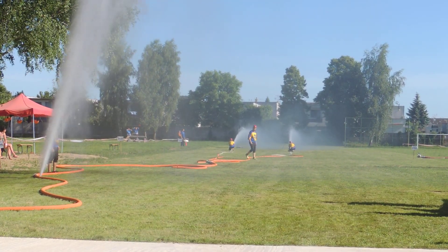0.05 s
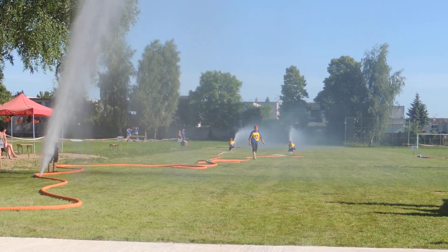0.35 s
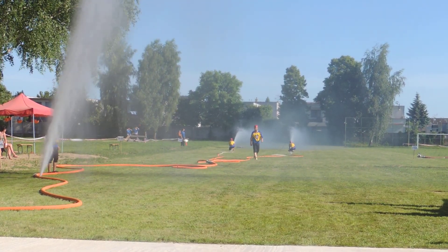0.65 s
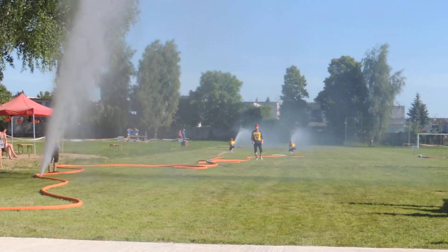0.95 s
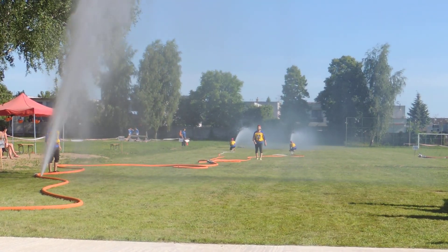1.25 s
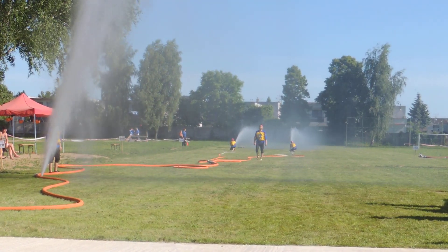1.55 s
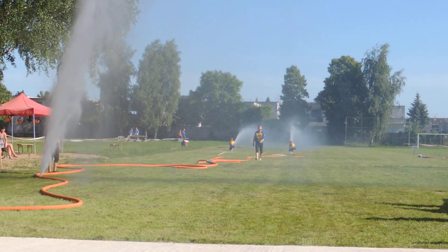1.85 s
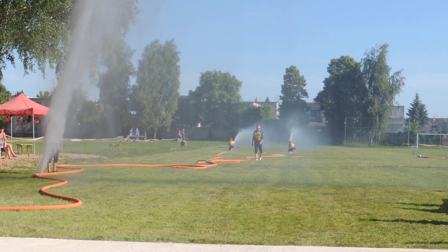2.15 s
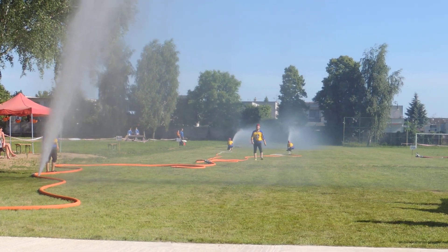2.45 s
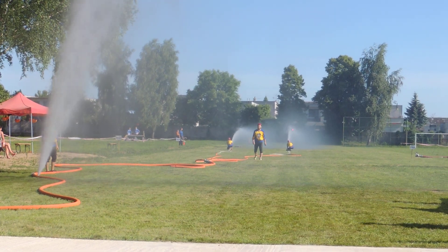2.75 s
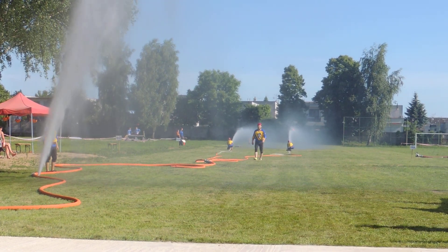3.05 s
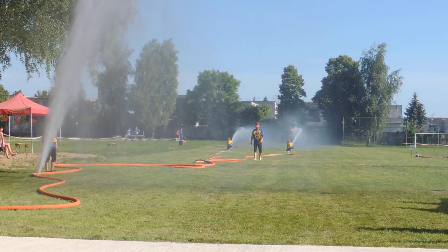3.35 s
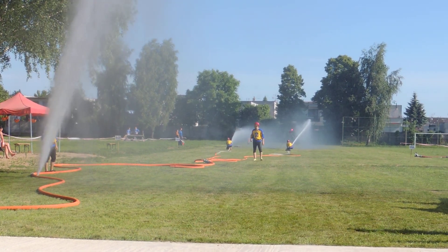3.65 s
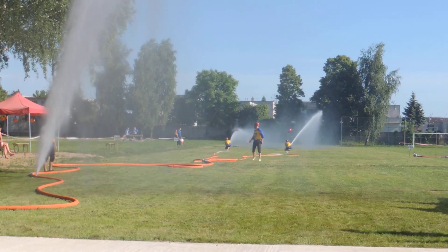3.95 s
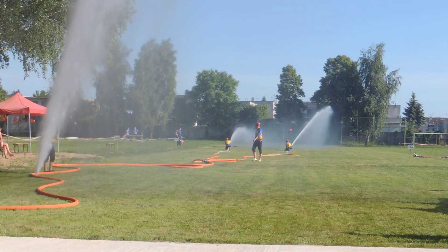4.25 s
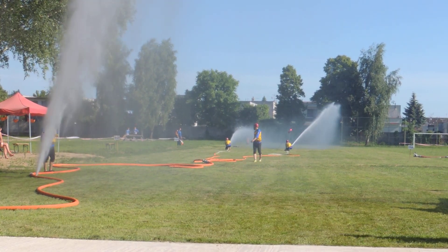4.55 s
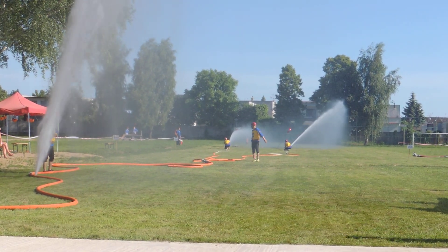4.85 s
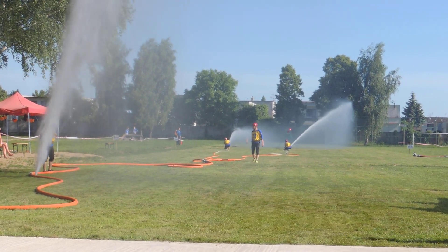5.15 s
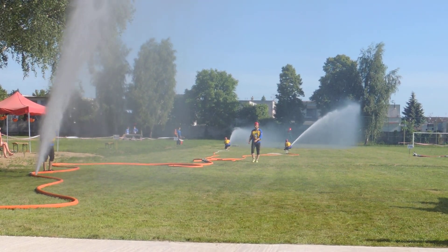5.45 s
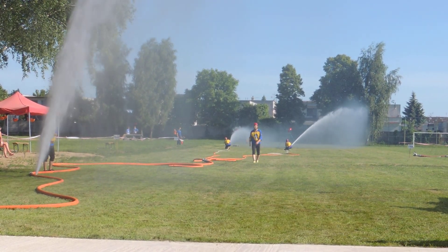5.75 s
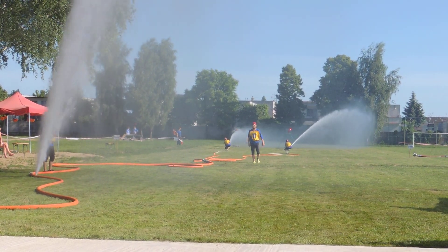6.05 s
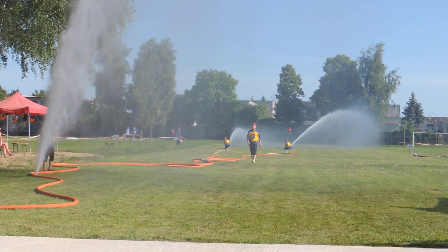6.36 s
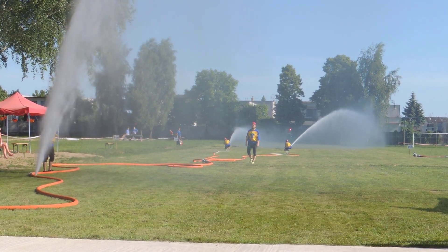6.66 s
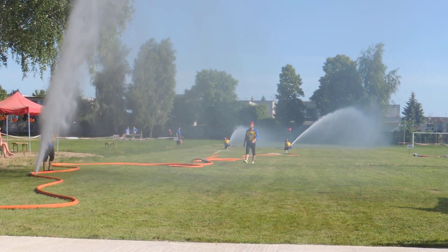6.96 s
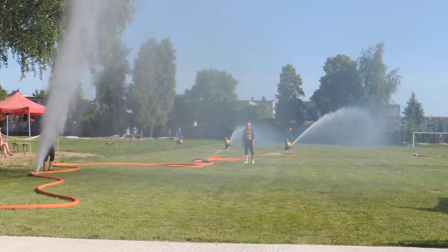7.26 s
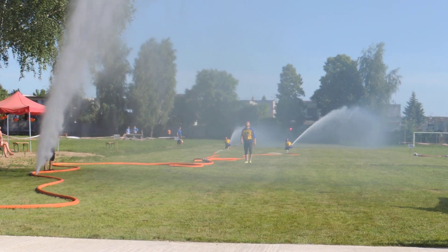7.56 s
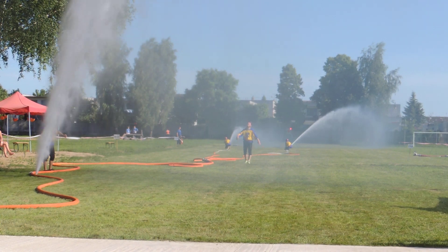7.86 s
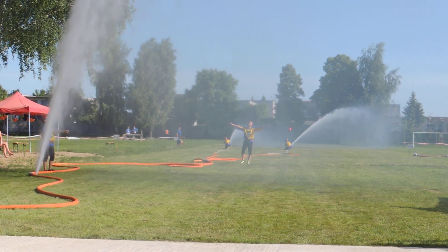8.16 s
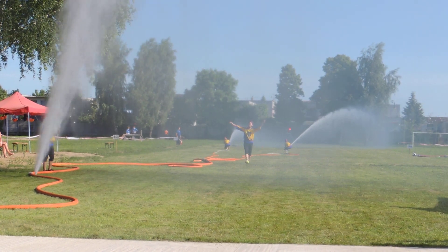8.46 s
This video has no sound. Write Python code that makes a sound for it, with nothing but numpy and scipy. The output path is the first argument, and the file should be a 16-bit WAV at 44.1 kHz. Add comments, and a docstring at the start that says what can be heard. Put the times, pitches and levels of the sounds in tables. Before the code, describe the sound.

Outdoors on a field, a pump engine at full throttle makes a steady, buzzing drone with a hard exhaust crackle, heard slightly from the left. Far behind it, spray from fire hoses hisses softly. The pitch lifts a touch and stays there until the last second, when the engine takes on load, drops lower and turns heavier and rougher.

```python
"""A four-cylinder fire pump engine runs flat out on a sports field, off to the left.
From the start its open exhaust drones and cracks, hardest at every second firing; the manifold buzzes,
gas rushes out, the field scatters the sound back and the water jets hiss far off.
Near 3 s the load eases and the revs climb a little, then hold.
From 7.5 s the pump bites: the revs sag and the engine lugs, thumping unevenly."""
import sys
import numpy as np
from scipy import signal
from scipy.fft import rfft, irfft
from scipy.io import wavfile
from scipy.ndimage import uniform_filter1d

SR = 44100
rng = np.random.default_rng(int(sys.argv[2]) if len(sys.argv) > 2 else 0)


def log_audio(samples):
    """Write samples as a 16-bit WAV file to the path given in sys.argv[1]."""
    # one column per channel
    frames = np.atleast_2d(samples).T
    # limit to full scale, then quantise
    limited = np.clip(frames, -1, 1)
    pcm = np.round(limited * 32767).astype(np.int16)
    wavfile.write(sys.argv[1], SR, pcm)


N = 375732
TIME = np.arange(N) / SR


# Relative levels of the exhaust orders by load: firing_multiple, light_db, working_db, heavy_db, lugging_db
EXHAUST_ORDERS = [(0.5, -56.5, -55.5, -53, -49.5), (1.0, -37, -32.5, -28, -30.5),
                  (1.5, -41.0, -41, -42, -38.0), (2.0, -38, -38, -27, -27.5),
                  (2.5, -45.0, -45.0, -37, -33.5), (3.0, -32.5, -28.0, -27, -33), (3.5, -47, -52, -35, -55),
                  (4.0, -34.5, -30.5, -31, -27.5), (4.5, -51, -52.0, -50, -45),
                  (5.0, -49.5, -44, -28.5, -35), (5.5, -50.5, -80, -50.0, -45), (6.0, -33, -34, -37.5, -44),
                  (6.5, -49.5, -46, -36, -41), (7.0, -38, -37, -44, -36), (7.5, -52, -60, -41, -52),
                  (8.0, -82, -66, -55, -48), (8.5, -50.5, -69, -65, -58.0), (9.0, -38, -38, -32.5, -43),
                  (9.5, -53.0, -57.5, -49, -41), (10.0, -37.5, -45, -53, -46),
                  (10.5, -51, -49.5, -49.0, -49), (11.0, -44, -38, -41, -41), (11.5, -81, -80, -47, -44),
                  (12.0, -49, -52, -51.0, -55)]

def drone(turns, load, level_db, pipe_hz=135, pipe_q=1.0, echo_s=0.00565, thump_s=0.00093, waver_hz=3):
    """Harmonic series: the pipe radiates engine orders, balanced by load and wavering in moving air."""
    multiples, *by_load = np.transpose(EXHAUST_ORDERS)
    mean_firing_hz = turns[-1] / TIME[-1]
    hz = multiples * mean_firing_hz
    # one reflection and the pipe's broad resonance set each order's phase
    reflection = 1 + 0.63 * np.exp(-2j * np.pi * hz * echo_s)
    impedance = 1 + 1j * pipe_q * (hz / pipe_hz - pipe_hz / hz)
    phases = np.angle(reflection / impedance)
    # under heavy load the blow-down pulls the whole orders into one thump per firing
    thump = np.clip(0.57 * (load - 1) / 2, 0, 1)
    note = np.zeros(N)
    for multiple, phase, levels_db in zip(multiples, phases, np.transpose(by_load)):
        gain = amp(np.interp(load, np.arange(len(levels_db)), levels_db) + 0.72 * wander(waver_hz))
        aligned = thump * (round(2 * multiple) % 2 == 0)
        angle = 2 * np.pi * multiple * (turns - aligned * thump_s * mean_firing_hz) + (1 - aligned) * phase
        waver = amp(-54) * np.sqrt(multiple / multiples[-1]) * wander(waver_hz)
        note -= gain * np.cos(angle) + waver * np.sin(angle)
    power = uniform_filter1d(note ** 2, size=8192)
    return from_left(amp(level_db) * note / np.sqrt(power))


def lope(turns, load, swing_db=0.4, stumble_db=1.0, stumble_hz=60):
    """Amplitude modulation: a lugging engine swings once a cycle and stumbles between firings."""
    lugging = np.clip((load - 1) / 2, 0, 1)
    swing = -np.cos(2 * np.pi * turns / len(CYLINDER_DB))
    return amp(lugging * (swing_db * swing + stumble_db * wander(stumble_hz)))


# Engine speed: time_s, firing_hz
FIRING_RATE = [(0, 134.9), (0.7, 134.9), (1.52, 135.41), (1.87, 134.76), (2.9, 135.45), (3.22, 136.81),
               (4.4, 136.88), (5.2, 136.47), (5.55, 136.91), (6.55, 136.62), (7.48, 137.0), (7.8, 135.39),
               (8.24, 131.63), (8.52, 125.03)]

def crankshaft(start_turn=0.63, unsteadiness=0.0006):
    """Phase is the integral of frequency: gives the firing rate and its phase, one turn per firing."""
    firing_hz = np.interp(TIME, *np.transpose(FIRING_RATE))
    unsteady_hz = firing_hz * (1 + unsteadiness * wander(12))
    return firing_hz, start_turn + np.cumsum(unsteady_hz) / SR


# Base levels at light, working, heavy and lugging load: firing_hz, drone_db, crack_db
LOAD_STATES = [(136.77, -26.5, -29.5), (135.45, -24.5, -27.5), (131.9, -20.5, -30.5), (129.3, -21, -32.5)]

def pump_load(firing_hz):
    """Torque balance: at full throttle, lower revs mean more load (0 to 3), which sets the levels."""
    rates_hz, drone_db, crack_db = np.transpose(LOAD_STATES)
    steps = np.arange(len(LOAD_STATES))
    load = np.interp(-firing_hz, np.sort(-rates_hz), steps)
    return load, np.interp(load, steps, drone_db), np.interp(load, steps, crack_db)


# Brief rises and dips of the engine sound: middle_s, length_s, drone_db, crack_db
LEVEL_SWELLS = [(1.313, 0.84, 0.8, -0.4), (1.9, 1, -1.3, -1.2), (2.16, 0.27, -0.5, -1.3),
                (2.346, 0.21, 2, 1.4), (3.07, 0.72, 1.2, 1.3), (3.326, 0.46, 0.5, 1), (5.897, 0.16, 1.6, 2),
                (6.41, 1, 0, 1.1), (6.866, 0.57, -2, -1), (7.8, 0.66, -0.2, 0.4), (8.174, 0.51, -3.4, -1.2)]

def swells():
    """Slow amplitude modulation: raised-cosine level changes of the drone and the cracks, in dB."""
    middle_s, length_s, *heights_db = np.transpose(LEVEL_SWELLS)
    position = np.clip((TIME - middle_s[:, None]) / length_s[:, None], -.5, .5)
    return np.array(heights_db) @ np.cos(np.pi * position) ** 2


# Relative crack strength of each cylinder, in firing order: level_db
CYLINDER_DB = [-2.5, -11, 1, -8]

def firings(turns, load, uneven_db=1.3, jitter_s=0.000016, catch_up=0.18):
    """Cyclic variation: an impulse for each burn, no two alike; weak cylinders catch up under load."""
    clicks = np.zeros(N)
    for cylinder, level_db in enumerate(CYLINDER_DB):
        numbers = np.arange(cylinder, turns[-1], len(CYLINDER_DB))
        numbers = numbers[numbers > turns[0]]
        chance = rng.standard_normal((512, 2))[:len(numbers)]
        centres = (np.interp(numbers, turns, TIME) + jitter_s * chance[:, 0]) * SR
        # a windowed sinc places each impulse between samples
        taps = centres.astype(int)[:, None] + np.arange(-8, 9)
        pulses = np.sinc(taps - centres[:, None]) * np.hanning(taps.shape[1])
        pulses *= amp(uneven_db * chance[:, 1:])
        strength = amp(level_db * (1 - catch_up * np.maximum(load - 1, 0)))
        clicks += strength * np.bincount(np.clip(taps, 0, N - 1).ravel(), pulses.ravel(), N)
    return clicks


# Spectrum of the shock front: frequency_hz, gain_db
SHOCK_SPECTRUM = [(100, -54), (600, 6.5), (1100, -15), (1400, -10.5), (1750, -2), (2300, -9), (2680, -13),
                  (2950, 8), (3800, -0.5), (6600, -3.5), (7150, 6.5), (7600, 2.5), (8300, 3.5), (9400, -3),
                  (14200, -7.5)]
# Reflections from the ground and the pump frame: delay_s, gain
REFLECTIONS = [(.0007, 0.23), (.0019, 0.25), (.0042, .25)]

def cracks(clicks, level_db):
    """Nonlinear steepening: each blow-down becomes a shock front, followed by its reflections."""
    shock = -colour(clicks, SHOCK_SPECTRUM)[0]
    echoes = sum(gain * np.interp(TIME - delay_s, TIME, shock, left=0) for delay_s, gain in REFLECTIONS)
    near = amp(-5) * scatter(shock, t60_s=0.021)
    far = amp(-10) * scatter(shock, t60_s=0.1)
    return amp(level_db) * unit(from_left(shock + echoes) + near + far)


# Spectrum of the rushing exhaust gas: frequency_hz, gain_db
GAS_SPECTRUM = [(30, -15.5), (90, -7), (200, -3), (420, -1), (600, -3.5), (900, 1), (1120, -5.5), (1400, 0),
                (1750, -5.5), (2350, 3.5), (2700, -24), (3200, -2.5), (4400, -4), (6700, -4.5), (7200, 1),
                (7700, -3), (9400, -6.5), (12500, -5.5), (14200, -9.5)]

def gas_rush(clicks, level_db, burst_s=0.00029, tail_s=0.0055, steady=0.78, diffuse_hz=1500):
    """Turbulence noise: each firing spits a decaying burst of gas on top of a steady flow."""
    burst, tail = (signal.lfilter([1], [1, -np.exp(-1 / (SR * s))], clicks) for s in (burst_s, tail_s))
    lingering = 0.089 * tail + steady
    direct = from_left(colour((burst + lingering) * rng.standard_normal(N), GAS_SPECTRUM))
    diffuse = colour(lingering * rng.standard_normal((2, N)), GAS_SPECTRUM)
    # long waves arrive alike on both sides, so only the treble is diffuse
    return amp(level_db) * unit(direct + amp(1.2) * highpass(diffuse, diffuse_hz))


# Resonances of the ringing manifold: frequency_hz, gain_db
MANIFOLD_RESONANCES = [(100, -36), (170, 1), (270, -24), (370, 7), (440, -22.5), (510, 13), (580, -25),
                       (650, 3.5), (1000, 2), (1130, -7), (1440, -3.5), (1600, -7.5), (1830, -1),
                       (1900, -5), (2020, 8.5), (2130, -8), (2330, 9), (2450, 4.5), (2560, -22),
                       (2760, -28), (2860, 16), (3000, -9), (3280, 4), (3420, -6), (3880, 4), (4300, -27),
                       (5200, -1.5), (6400, -10), (7200, -8.5), (9400, -14.5), (14000, -16)]

def manifold_rasp(turns, level_db, ring_s=0.03, odd_db=-6, drift=0.3, drift_hz=4, size=2048):
    """Forced vibration: each firing rattles its manifold branch, a buzz that repeats once a cycle."""
    cylinders = len(CYLINDER_DB)
    cycle_grid = np.arange(size) / size
    cylinder, turns_since = np.divmod(cycle_grid * cylinders, 1)
    since_s = turns_since * TIME[-1] / turns[-1]
    decay = amp(CYLINDER_DB)[cylinder.astype(int)] * np.exp(-since_s / ring_s)
    orders = rfft(decay * rng.standard_normal((2, size)))[:, :400]
    # all orders start equally strong; the resonances pick them out as the revs move
    orders /= abs(orders)
    # the two halves of a cycle sound nearly alike, so the odd orders are weaker
    orders[:, 1::2] *= amp(odd_db)
    # the low orders leave through the pipe, as the drone
    orders[:, np.round(np.transpose(EXHAUST_ORDERS)[0] * cylinders).astype(int)] = 0
    shapes = irfft(orders, size)
    steady, changing = (np.interp(turns / cylinders, cycle_grid, shape, period=1) for shape in shapes)
    ring = colour(steady + drift * wander(drift_hz) * changing, MANIFOLD_RESONANCES)[0]
    return amp(level_db) * unit(from_left(ring) + amp(-13) * scatter(ring, t60_s=0.16))


# Phase lead of the engine's sound on the left: frequency_hz, lead_rad
LEFT_LEAD = [(0, 0.41), (135, 0.18), (500, 0.43), (1550, 1.22), (1900, 1.64), (2240, 2.19), (2600, 1.97),
             (3100, 3.12), (4500, 3.4), (5900, 4.21), (7400, 5.84), (8600, 7.55), (10100, 5.9),
             (12400, 9.6), (14500, 11)]

def from_left(sound):
    """Path difference and diffraction: the engine's sound reaches the left side first."""
    sound = np.ravel(sound)
    lead_rad = np.interp(np.fft.rfftfreq(N, 1 / SR), *np.transpose(LEFT_LEAD))
    return np.array([sound, irfft(rfft(sound) * np.exp(-1j * lead_rad), N)])


def flutter(depth_db=0.84, rate_hz=7):
    """Scintillation: moving air makes the treble flutter on its way across the field, in dB."""
    gusts = wander(rate_hz)
    return depth_db * (gusts - uniform_filter1d(gusts, size=SR // 4))


def scatter(sound, t60_s, size=8192):
    """Diffuse reflection: the field returns an exponentially decaying tail, different on each side."""
    tail = rng.standard_normal((2, size)) * amp(-60 * np.arange(size) / SR / t60_s)
    tail /= np.linalg.norm(tail, axis=1, keepdims=True)
    return signal.oaconvolve(np.atleast_2d(sound), tail, axes=1)[:, :N]


# Spectrum of the distant water spray: frequency_hz, gain_db
SPRAY_SPECTRUM = [(25, -15), (80, -21), (300, -13), (1000, 8), (2700, -13), (4000, 1.5), (8000, -5.5),
                  (14000, -12)]

def water_jets(level_db=-39, swell_db=2.1, swell_hz=7.1, wide_above_hz=1200):
    """Broadband noise: far-off spray hisses and swells, its treble decorrelated between the sides."""
    side = highpass(rng.standard_normal(N), wide_above_hz)
    spray = rng.standard_normal(N) + np.array([side, -side])
    return amp(level_db + swell_db * wander(swell_hz)) * unit(colour(spray, SPRAY_SPECTRUM))


def amp(db):
    """Decibels to amplitude ratio."""
    return 10 ** (np.asarray(db) / 20)


def unit(sound):
    """Normalisation to rms 1."""
    return sound / np.sqrt(np.mean(sound ** 2) + 1e-20)


def wander(rate_hz, size=2048):
    """Low-pass noise: a random drift of rms about 1."""
    hz = np.fft.rfftfreq(size, TIME[-1] / size)
    drift = unit(irfft(rfft(rng.standard_normal(size)) / (1 + (hz / rate_hz) ** 2)))
    return np.interp(TIME, np.linspace(0, TIME[-1], size), drift)


def highpass(sound, corner_hz):
    """First-order high-pass filter."""
    return signal.sosfilt(signal.butter(1, corner_hz, "high", fs=SR, output="sos"), sound)


def spectrum_db(spectrum, hz):
    """Interpolation on a log-frequency axis."""
    points_hz, gain_db = np.transpose(spectrum)
    return np.interp(np.log(hz + 1), np.log(points_hz + 1), gain_db)


def colour(sound, spectrum, size=4096):
    """Minimum-phase filter: imposes a spectrum without smearing attacks backwards."""
    log_gain = np.log(amp(spectrum_db(spectrum, abs(np.fft.fftfreq(size, 1 / SR)))))
    response = np.exp(np.conj(signal.hilbert(log_gain)))
    taps = np.fft.ifft(response).real[:size // 2]
    return signal.oaconvolve(np.atleast_2d(sound), taps[None], axes=1)[:, :N]


def scene(rasp_db_per_load=1.74):
    """Superposition: one crankshaft times the drone, rasp, cracks and gas; the jets hiss behind them."""
    flutter_db = flutter()
    firing_hz, turns = crankshaft()
    load, *levels_db = pump_load(firing_hz)
    drone_db, crack_db = np.array(levels_db) + swells()
    crack_db += flutter_db
    clicks = firings(turns, load)
    engine = drone(turns, load, drone_db + 0.4) * lope(turns, load)
    engine += manifold_rasp(turns, crack_db - 3.5 + rasp_db_per_load * load)
    engine += cracks(clicks, crack_db - 0.9)
    engine += gas_rush(clicks, crack_db + 0.48)
    return engine + water_jets()


# Level difference between the sides: frequency_hz, left_minus_right_db
SIDE_SHADOW = [(100, 2), (500, -1.4), (1280, 1.5), (2370, 2), (4400, 2), (8000, 3), (14000, 4)]

def record(dry, edge_hz=14250):
    """Acoustic shadow: the right side is weaker at most frequencies; a low-pass then limits the band."""
    shadow_db = spectrum_db(SIDE_SHADOW, np.fft.rfftfreq(N, 1 / SR))
    shaded = irfft(rfft(dry) * amp([shadow_db / 2, -shadow_db / 2]), N)
    lowpass = signal.firwin(601, edge_hz, window=("kaiser", 9), fs=SR)
    return signal.oaconvolve(shaded, lowpass[None], "same")


dry = scene()
out = record(dry)
log_audio(out)
```